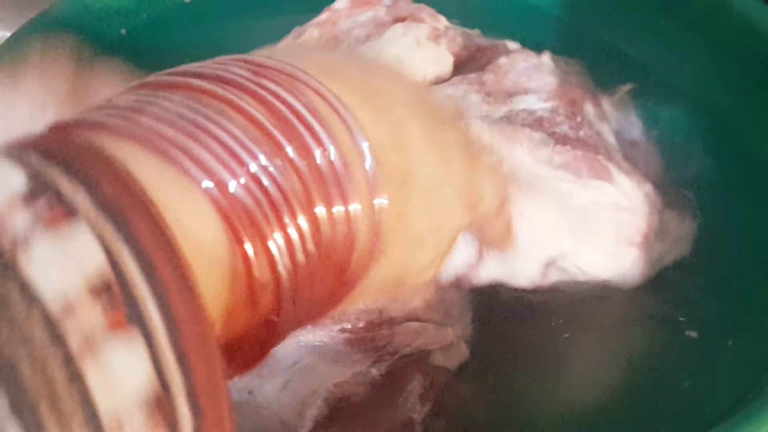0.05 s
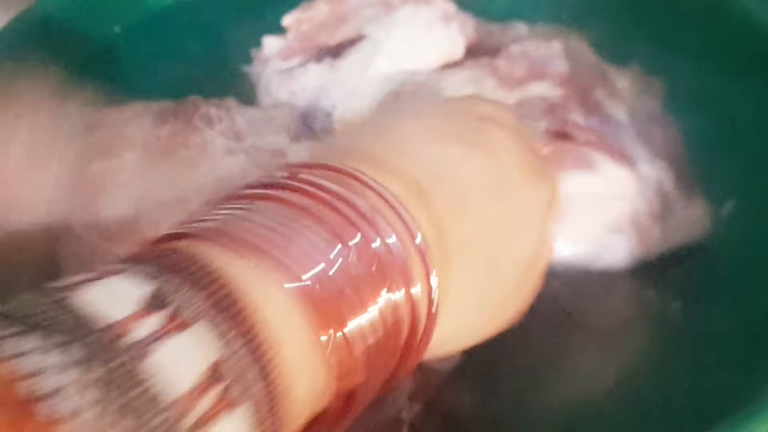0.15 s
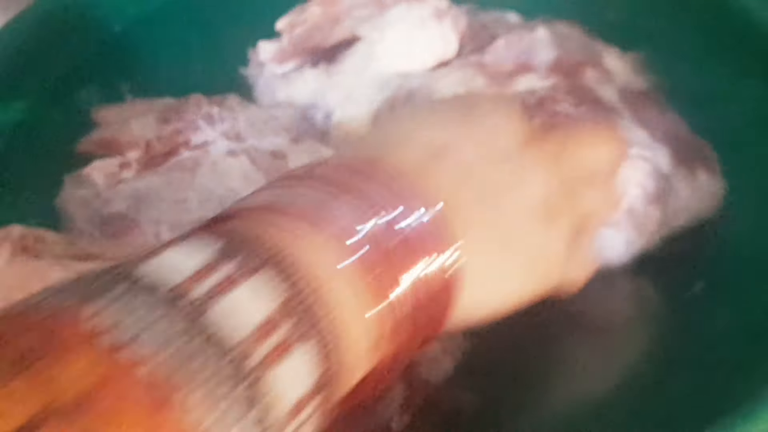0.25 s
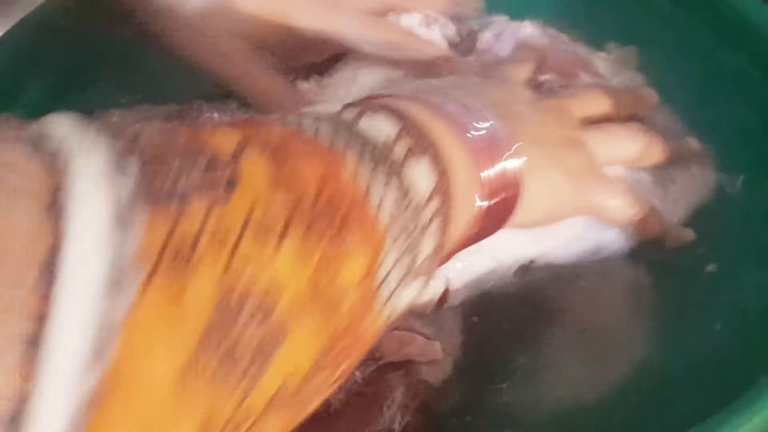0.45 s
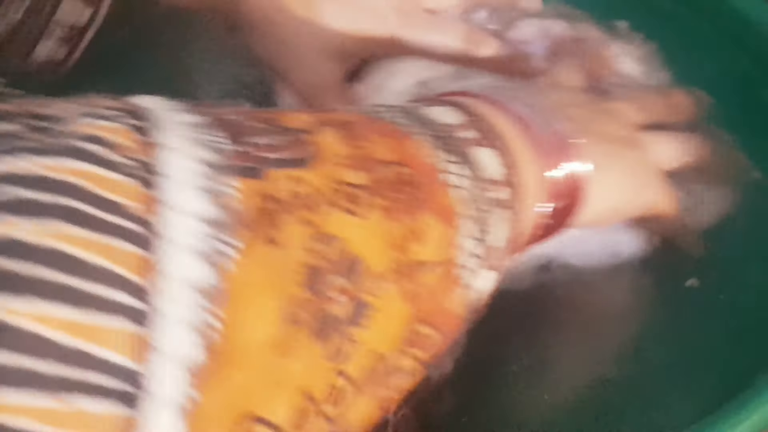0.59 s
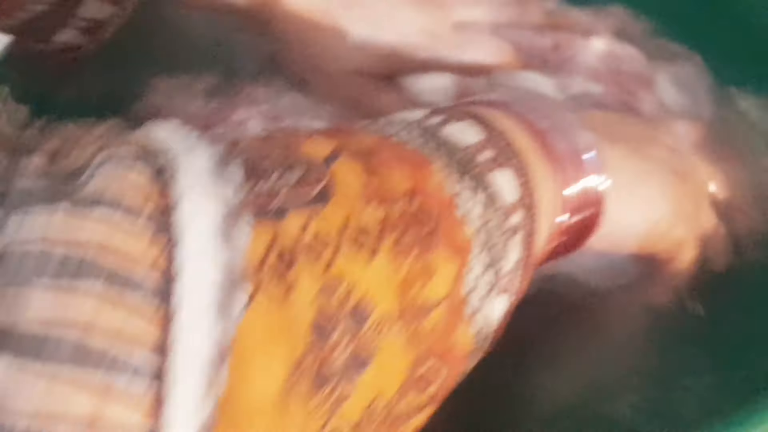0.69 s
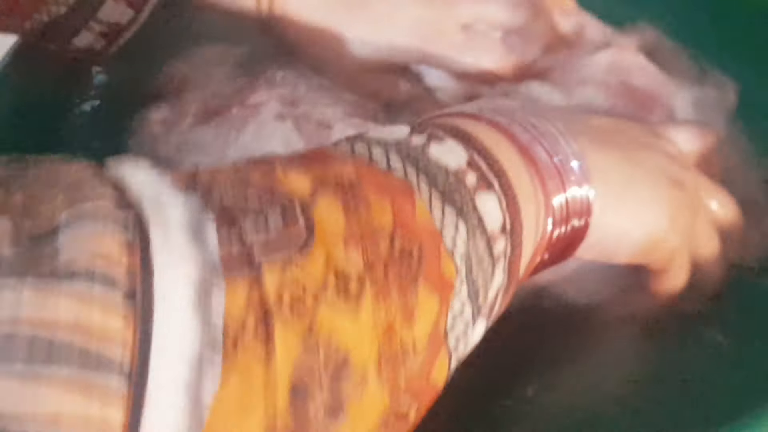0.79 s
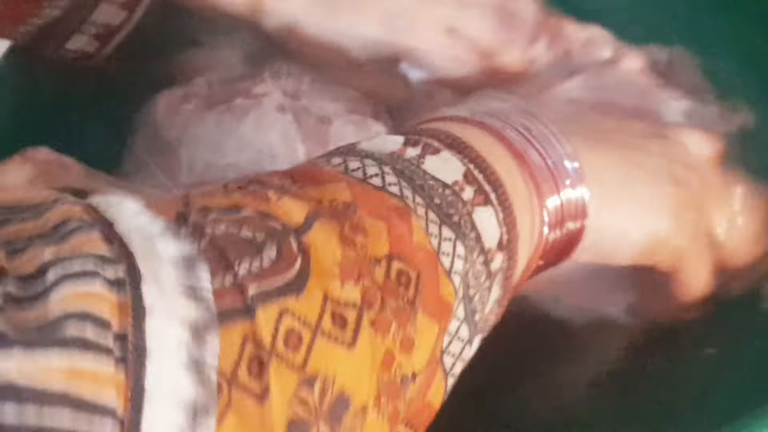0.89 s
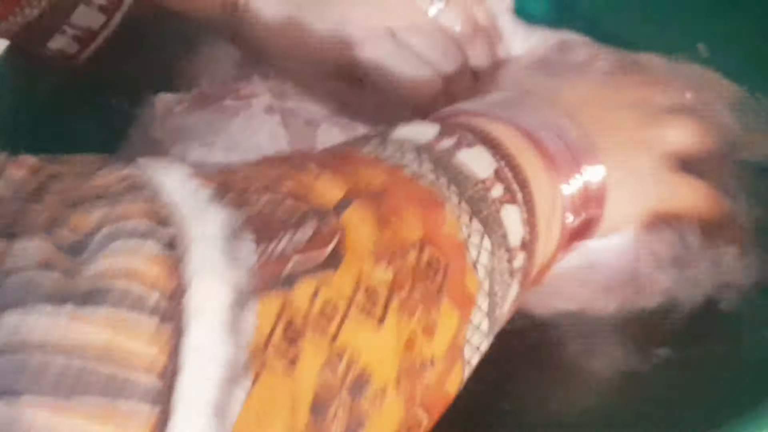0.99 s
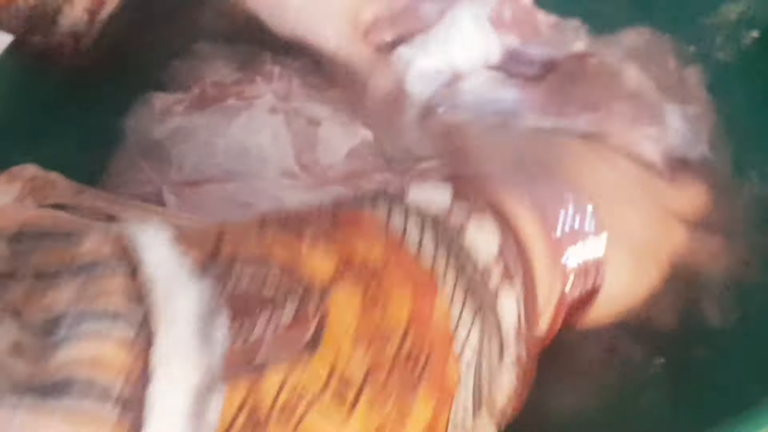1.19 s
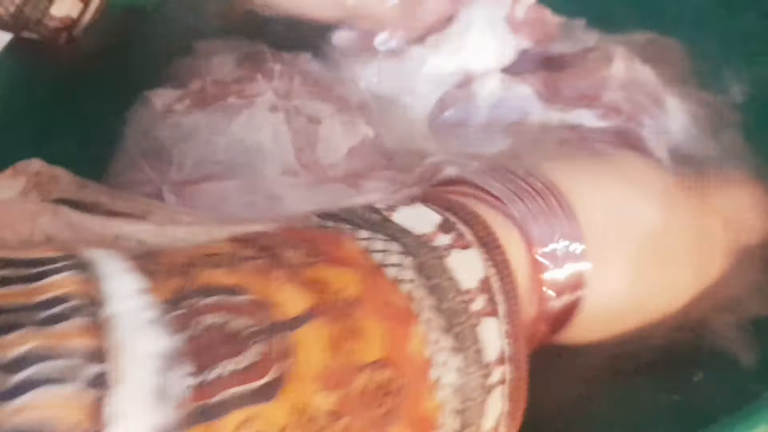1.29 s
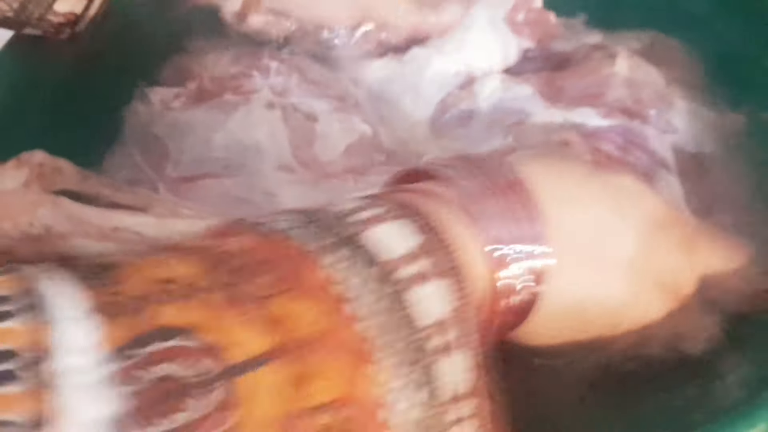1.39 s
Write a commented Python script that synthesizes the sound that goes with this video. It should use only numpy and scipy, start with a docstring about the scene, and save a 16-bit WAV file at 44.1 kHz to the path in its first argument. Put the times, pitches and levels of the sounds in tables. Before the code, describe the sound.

Water sloshes and bubbles around meat washed by hand in a plastic tub; early on a faint bangle clink and one hard, booming knock, then bubbles and drips thicken to a splashy end. Close microphone, hard-walled kitchen.

```python
"""A hand washes meat in a plastic tub of water, close by in a hard-walled kitchen, a little nearer the right
port. Over a low rumble of filtered noise a glass bangle clinks, as a tick and wavering damped sines; droplets
tick. Something knocks hard once: a short bark, then ringing modes and a lumpy wash of noise boom round the
room. A second, softer clink follows. Then bubbles pop, as damped sines that rise in pitch, and droplets tick
ever more densely, with two high clinks of other bangles among them; soft slosh, a swarm of tiny pops under
shaped noise, surges near the end."""
import sys
import numpy as np
from scipy import signal
from scipy.fft import rfft, irfft, next_fast_len
from scipy.io import wavfile
from scipy.ndimage import map_coordinates

SR = 44100
rng = np.random.default_rng(int(sys.argv[2]) if len(sys.argv) > 2 else 0)


def pcm_store(signal):
    """Save signal as 16-bit PCM."""
    levels = np.round(np.clip(np.atleast_2d(signal), -1, 1) * 32767)
    wavfile.write(sys.argv[1], SR, levels.astype(np.int16).T)


def volts(x):
    """Linear amplitude factor 10**(x/20) for a level x in dB, scalar or array-like."""
    e = np.asarray(x, float) / 20
    return 10 ** e


N = 63945  # samples, 1.45 s

# Room modes that boom after the knock. Each row: frequency in Hz, relative level in dB, t60 in seconds.
BOOM_MODES = [(59.7, -11.5, 0.66), (96.7, -15.5, 1), (140.9, -12, 0.68), (289.3, -2, 0.74),
              (334.4, 2, 0.22), (392.5, 1, 0.29), (499, -2, 0.3), (570.6, 3, 0.16), (632.8, -2, 0.45),
              (1001, -9.5, 0.53), (1200, -5, 0.39)]
# Colour of the knock's diffuse wash. Each row: frequency in Hz, relative level in dB.
WASH_COLOUR = [(50, -47), (100, -6.5), (200, -24.5), (300, -7), (1050, -11.5), (2600, -22.5), (3300, -33.5),
               (6500, -36), (8000, -45.5), (15000, -42)]
# Clinks of the bangles. Each row: start in seconds, level in dB before placing in the room.
CLINKS = [(0.1434, -42.5), (.463, -45)]
# Modes of the bangle glass. Each row: frequency in Hz, relative level in dB, t60 in seconds.
GLASS_MODES = [(5300, -18, 0.13), (9750, 2, 0.057), (10200, 0, 0.052), (14300, 5, 0.017)]
# Single bubbles. Each row: start in seconds, peak level in dB before placing, starting pitch in Hz,
# life in cycles of that pitch, pitch rise as a fraction.
BUBBLES = [(.185, -45, 1815, 2.5, .05), (.195, -55, 1750, 13, 0.42), (0.633, -43.5, 3570, 14.4, 0.056),
           (0.665, -41, 4280, 12, 0.057), (0.676, -44, 1695, 17, 0.11), (0.696, -39, 1060, 2, 0.074),
           (0.737, -41.5, 991, 14.6, 0.045), (0.766, -27.5, 2056, 20, 0.45), (0.953, -46, 1465, 7.5, 0.11),
           (0.972, -52, 1200, 13.5, 0.053), (1.044, -51.5, 1620, 15, 0.075),
           (1.065, -39.5, 2880, 8.6, 0.089), (1.081, -46, 3480, 22, .05), (1.075, -31, 1782, 7.8, 0.26),
           (1.173, -49, 840, 7.9, 0.059), (1.198, -37, 1200, 5.6, 0.21), (1.218, -43, 2220, 5.8, .05),
           (1.272, -39.5, 372, 7.9, 0.046), (1.279, -34, 1168, 10.3, 0.091), (1.327, -41, 337, 8.9, 0.031),
           (1.238, -33.5, 2040, 5.7, 0.094), (1.267, -30.5, 1127, 16.7, 1), (1.295, -29, 1848, 29, 0.06),
           (1.351, -35.5, 1775, 23, 0.4), (1.385, -30, 3900, 7.5, .05), (1.389, -26.5, 1150, 9.1, 0.44),
           (1.388, -41.5, 460, 9, 0.1)]
# Droplet ticks, and at 1.056 and 1.082 s high clinks of other bangles. Each row: start in seconds, peak level
# in dB before placing, pitch in Hz.
TICKS = [(.185, -44, 6460), (0.194, -49, 6540), (0.972, -33, 6640), (1.014, -40, 5000), (1.055, -42, 7600),
         (1.056, -37, 12800), (1.082, -40.5, 12600), (1.1, -46.5, 6750), (1.142, -44.5, 9850),
         (1.209, -46, 13600), (1.233, -42, 7200), (1.274, -42, 11500), (1.284, -37, 7900),
         (1.294, -28.5, 6730), (1.356, -23.5, 6180), (1.396, -39, 11400)]
# How hard the hand stirs. Each row: time in seconds, then relative levels in dB of the slosh,
# the fizz and the surge against the walls.
STIRRING = [(0, -62.5, -54, -39), (0.078, -70, -64, -48), (0.188, -69, -85, -45.5), (.33, -96, -53, -53),
            (.42, -66, -55.5, -50), (.6, -53, -63.5, -45.5), (0.678, -51, -49, -43),
            (0.781, -49.5, -55, -46.5), (0.901, -64.5, -74, -49), (0.981, -51.5, -58, -46),
            (1.07, -63.5, -54, -48.5), (1.154, -75, -58, -48), (1.199, -55.5, -48, -51.5),
            (1.284, -38.5, -75, -35), (1.33, -47, -55, -37), (1.399, -44, -44.5, -44),
            (1.45, -54, -73, -43.5)]
# Colours of the three water noises. Each row: frequency in Hz, relative level in dB.
SLOSH_COLOUR = [(250, -27), (450, -6.5), (2240, -8), (2750, -16.5), (6000, -17), (7800, -53)]
FIZZ_COLOUR = [(3000, -4.5), (7400, -7.5), (8200, -36), (12200, -5), (16000, -17.5)]
SURGE_COLOUR = [(30, -23), (64, -7.5), (140, 1), (190, -18.5), (286, -7.5), (447, -21), (1500, -41)]
# How long the kitchen rings. Each row: frequency in Hz, t60 in seconds.
KITCHEN_DECAY = [(100, 0.73), (500, 0.62), (8000, 0.37), (15000, 0.28)]
# Likeness of the two ports in diffuse sound. Each row: frequency in Hz, left-right correlation (1 = same).
PORT_LIKENESS = [(60, 0.83), (200, 0.98), (500, 0.49), (1500, 0.031)]


def knock():
    """A hard blow: a hollow bark up close, then slowly swelling modes and a diffuse wash."""
    start_s = 0.2305
    bark_hz, bark_t60_s = 994, 0.023
    boom_db, wash_db = -15, -14
    t = np.arange(N) / SR
    bark = volts(-60 * t / bark_t60_s) * np.sin(2 * np.pi * bark_hz * t)
    bark = bark * (1 - np.exp(-t / 0.00056))
    boom = volts(boom_db) * ring(BOOM_MODES, swell_s=0.009, waver_db=2, waver_per_s=60)

    wash = tail(WASH_COLOUR)[:, :SR] * volts(1.56 * wobble(68.8)[:SR])  # lumpy decay
    first_50_ms = wash[:, :SR // 20]
    wash = volts(wash_db) * wash / np.sqrt(np.mean(first_50_ms ** 2))
    wash = wash * (1 - np.exp(-t[:SR] / 0.001))
    return near(placed(start_s, bark + boom)) + placed(start_s, wash)


def bangles():
    """Each clink is a sharp noise tick and wavering modes of glass, heard close and through the room."""
    tick_db, tick_t60_s, room_db = 5.5, 0.0056, 2
    t = np.arange(N) / SR
    dry = np.zeros(N)
    for start_s, db in CLINKS:
        glass = ring(GLASS_MODES, swell_s=0.00047, waver_db=5.0, waver_per_s=910)
        bright_noise = np.diff(rng.standard_normal(N + 2), 2) / 3  # differencing tilts it to the treble
        tick = volts(tick_db - 60 * t / tick_t60_s) * bright_noise
        dry = dry + placed(start_s, volts(db) * (glass + tick))
    return near(dry) + volts(room_db) * room(dry)


def splashes():
    """Bubbles ring as damped sines; droplets, and two high clinks of other bangles, tick at steady pitch, each
    with a burst of spray noise."""
    tick_cycles, spray_decay_s = 8.6, 0.0048
    tub_echo_s, tub_echo_db = 0.0065, -14
    start_s, db, hz = np.transpose(TICKS)
    bubbles = pops(*np.transpose(BUBBLES))
    ticks = pops(start_s, db, hz, tick_cycles + 0 * start_s, 0 * start_s)

    t = np.arange(600) / SR
    spray = np.zeros(N)
    for tick_s, tick_db in zip(start_s, db):
        burst = rng.standard_normal(600) * np.exp(-t / spray_decay_s) / 3
        spray = spray + placed(tick_s, volts(tick_db) * burst)
    spray_band = signal.butter(2, [1200, 15000], "band", fs=SR, output="sos")
    spray = signal.sosfilt(spray_band, spray)

    dry = bubbles + ticks + spray
    # the far wall of the tub throws each pop back
    return dry + volts(tub_echo_db) * placed(tub_echo_s, dry)


def water():
    """Stirring drives slosh with small bubbles, fine fizz and a low surge, around the single splashes."""
    small_db, fine_db, room_db = -1.5, -5, -9.5
    time_s, *levels_db = np.transpose(STIRRING)
    t = np.arange(N) / SR
    slosh, fizz, surge = (volts(np.interp(t, time_s, level)) for level in levels_db)

    small = swarm(per_s=600, hz=1900, spread=0.42, cycles=5.4, size_db=5.5)
    fine = swarm(per_s=450, hz=8000, spread=0.67, cycles=2.3, size_db=3)
    grains = volts(small_db) * slosh * small + volts(fine_db) * fizz * fine + splashes()

    # the noise beds waver irregularly in level
    slosh_bed = slosh * volts(2.6 * wobble(60)) * rush(SLOSH_COLOUR)
    fizz_bed = fizz * volts(2.5 * wobble(90)) * rush(FIZZ_COLOUR)
    rumble = surge * volts(2.1 * wobble(11.61)) * rush(SURGE_COLOUR)
    return near(grains) + volts(room_db) * room(grains) + slosh_bed + fizz_bed + rumble


def pops(start_s, db, hz, cycles, rise):
    """Damped sines with a soft start whose pitch rises as the bubble nears the surface."""
    t = np.arange(1400) / SR
    age = t * (hz / cycles)[:, None]  # in lives
    phase = 2 * np.pi * cycles[:, None] * (age + rise[:, None] * age ** 2 / (1 + age))
    envelope = 9 * (1 - np.exp(-age / 0.18)) ** 2 * np.exp(-3.5 * age)
    rows = volts(db)[:, None] * envelope * np.sin(phase)
    at = np.round(start_s * SR).astype(int)[:, None] + np.arange(len(t))
    return np.bincount(at.ravel(), rows.ravel(), N + len(t))[:N]


def swarm(per_s, hz, spread, cycles, size_db):
    """Tiny pops of rms 1 at random times and pitches, a few much larger than the rest."""
    count = int(per_s * N / SR)
    place, size = rng.random((count, 2)).T
    pitch_draw, life_draw = rng.standard_normal((count, 2)).T
    pitch = np.clip(hz * np.exp(spread * pitch_draw), 1000, 15000)
    db = -size_db * np.log(size + 1 / 40)
    life = cycles * np.exp(0.69 * life_draw)
    return unit(pops(place * N / SR, db, pitch, life, 0.1 + 0 * pitch))


def ring(modes, swell_s, waver_db, waver_per_s):
    """Damped sines with random phase, each wavering in level on its own."""
    t = np.arange(N) / SR
    total = np.zeros(N)
    for hz, db, t60_s in modes:
        level = volts(db + waver_db * wobble(waver_per_s) - 60 * t / t60_s)
        total = total + level * np.sin(2 * np.pi * (hz * t + rng.random()))
    return total * (1 - np.exp(-t / swell_s)) ** 2


def near(x):
    """A close source reaches the right port 4 samples before the left, and 5 dB louder."""
    return np.array([volts(-2.5) * np.roll(x, 4), volts(2.5) * x])


def room(x):
    """The kitchen's diffuse answer to a dry sound, after a gap of 4.8 ms."""
    late = np.pad(x, (round(0.0048 * SR), 0))[None]
    return signal.fftconvolve(late, tail([(100, 0)]), axes=1)[:, :N]


def tail(spectrum):
    """The room's stereo decay, each band of noise dying at its own speed, left energy 1."""
    noise = paired(rng.standard_normal((2, SR)), spectrum)
    hz, t, bands = signal.stft(noise, SR, nperseg=256)
    decay = volts(-60 * t / along(KITCHEN_DECAY, hz)[:, None])
    h = signal.istft(bands * decay, SR, nperseg=256)[1]
    return h / np.linalg.norm(h[0])


def rush(spectrum):
    """Coloured stereo noise of rms 1."""
    return unit(paired(rng.standard_normal((2, N)), spectrum))


def paired(pair, spectrum):
    """Colour two unrelated noises and blend them into left and right with the ports' likeness."""
    n = pair.shape[1]
    size = next_fast_len(n + 8192)
    hz = np.fft.rfftfreq(size, 1 / SR)
    # cos(2 * angle) is the correlation of mid + side with mid - side
    angle = np.arccos(np.clip(along(PORT_LIKENESS, hz), -1, 1)) / 2
    coloured = rfft(pair, size) * volts(along(spectrum, hz))
    mid, side = irfft(coloured * [np.cos(angle), np.sin(angle)], size)[:, :n]
    return np.array([mid + side, mid - side])


def along(points, hz):
    """Read (Hz, value) points on a log frequency axis."""
    f, v = np.transpose(points)
    return np.interp(np.log(hz + 1), np.log(f + 1), v)


def wobble(rate):
    """A smooth random curve, rate knots a second."""
    knots = rng.standard_normal(int(N * rate / SR) + 4)
    return map_coordinates(knots, [np.arange(N) * rate / SR])


def placed(start_s, sound):
    """Put a sound at its start time in a silent track."""
    other_axes = [(0, 0)] * (sound.ndim - 1)
    return np.pad(sound, other_axes + [(round(start_s * SR), N)])[..., :N]


def unit(x):
    """Scale to rms 1."""
    return x / np.sqrt(np.mean(x ** 2) + 1e-20)


def scene():
    """Knock, bangles and water together in the kitchen."""
    return knock() + bangles() + water()


def band_limit(x):
    """A steep low-pass at the top of the band."""
    return signal.sosfilt(signal.butter(12, 16680, fs=SR, output="sos"), x)


def record(dry):
    """A phone's band limits: steep above 15.9 kHz, gentle below 50.7 Hz."""
    treble_limit = signal.ellip(8, 0.5, 60, 15900, fs=SR, output="sos")
    bass_limit = signal.butter(2, 50.7, "high", fs=SR, output="sos")
    mix = signal.sosfilt(treble_limit, dry)
    mix = signal.sosfilt(bass_limit, mix)
    return band_limit(mix)


dry = scene()
out = record(dry)
pcm_store(out)
```